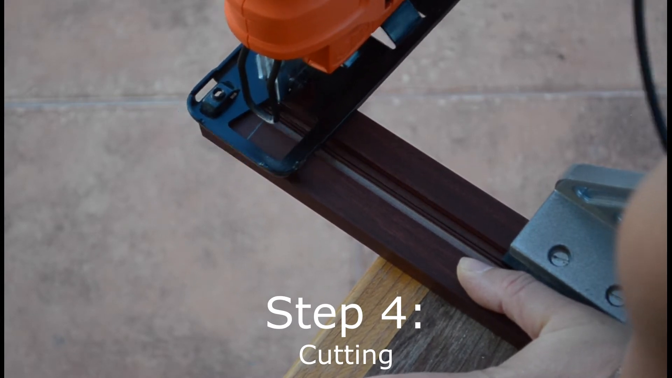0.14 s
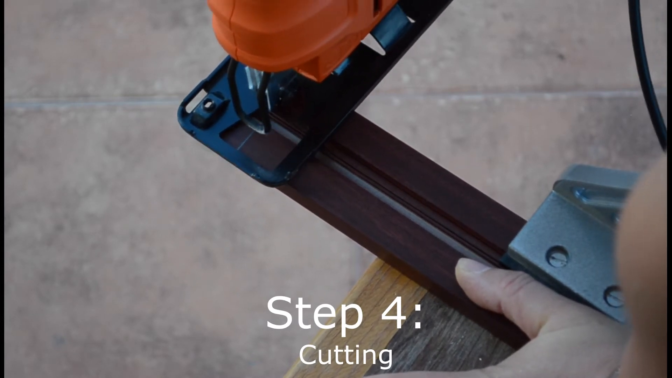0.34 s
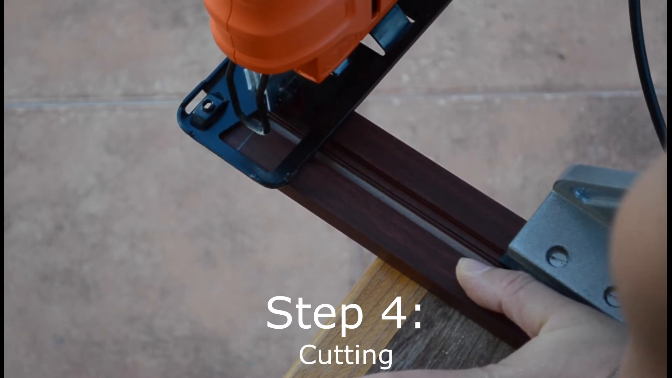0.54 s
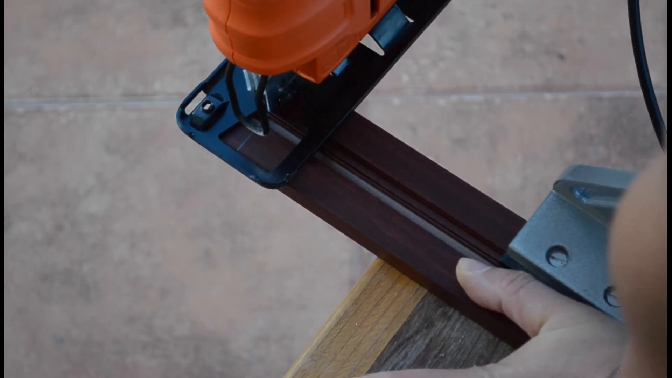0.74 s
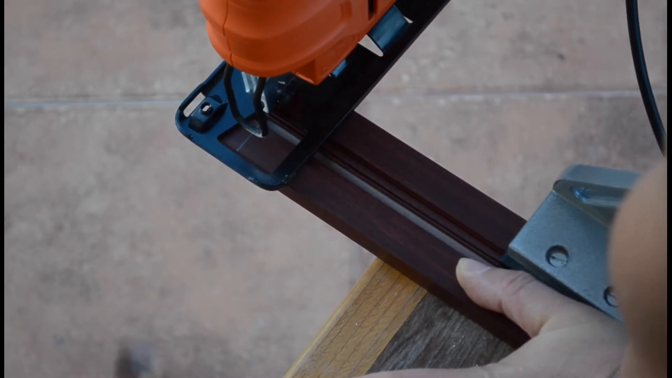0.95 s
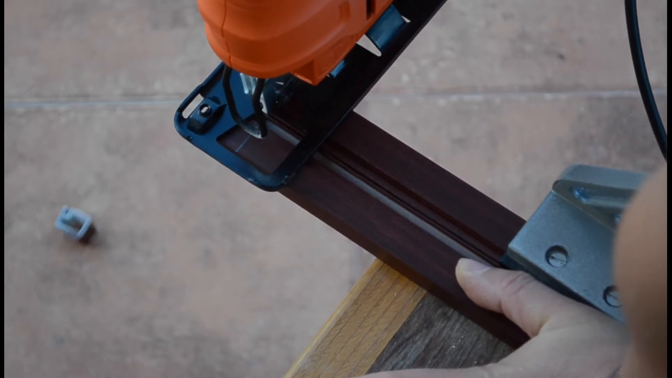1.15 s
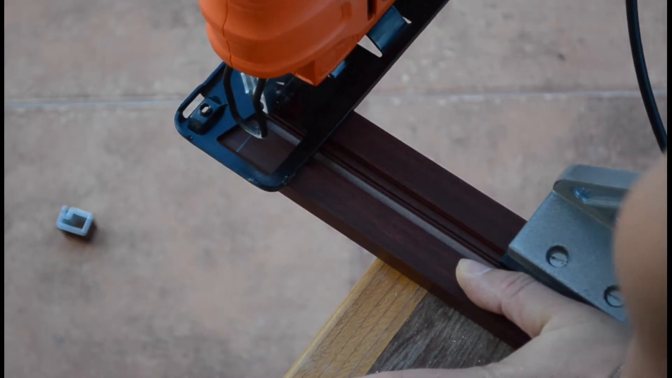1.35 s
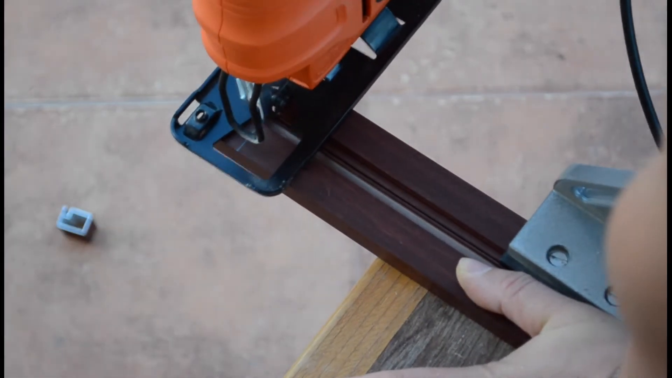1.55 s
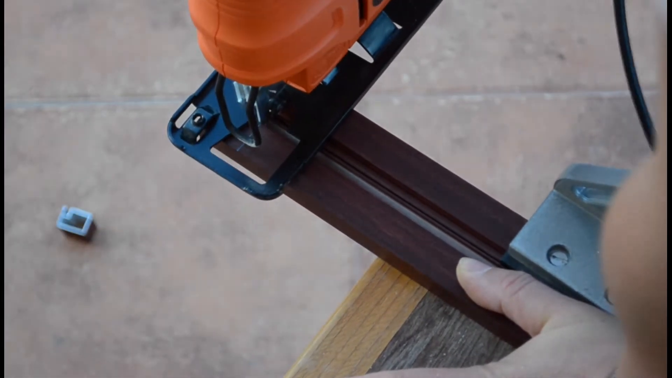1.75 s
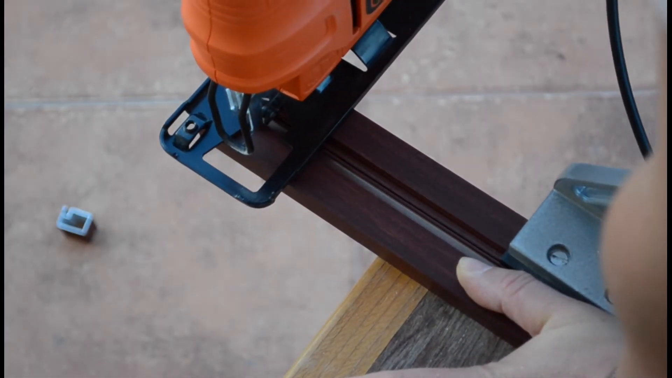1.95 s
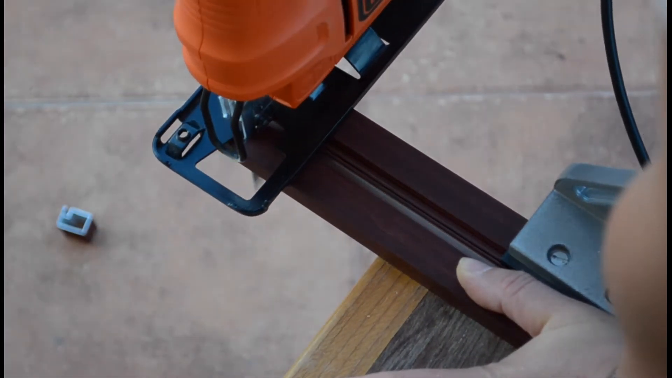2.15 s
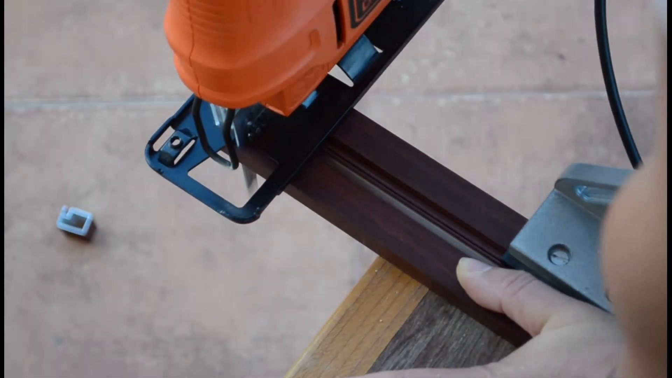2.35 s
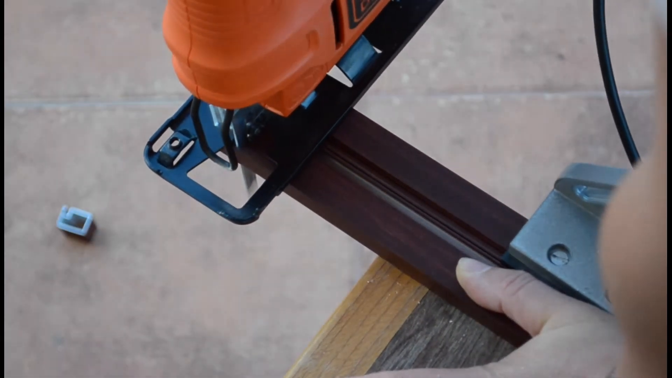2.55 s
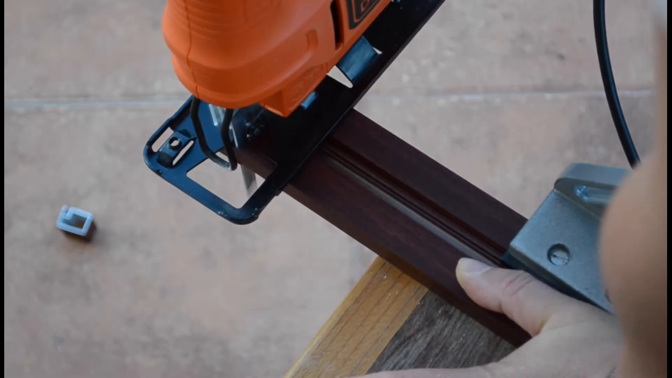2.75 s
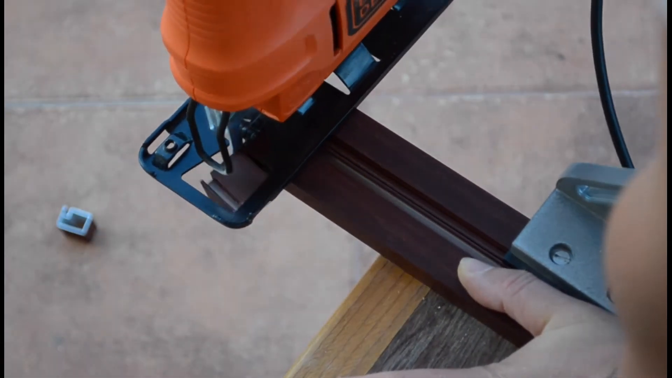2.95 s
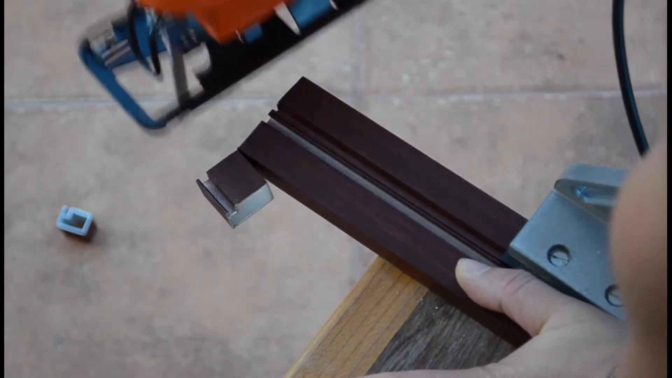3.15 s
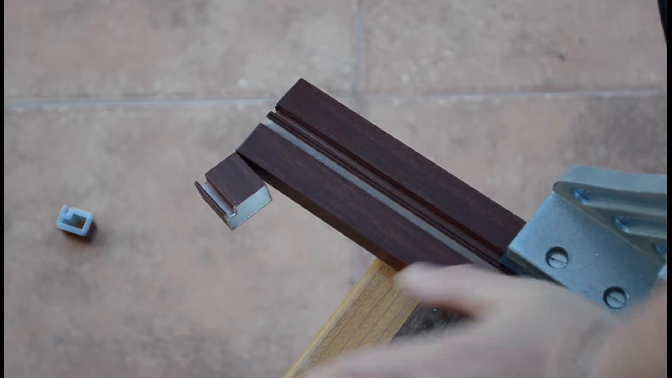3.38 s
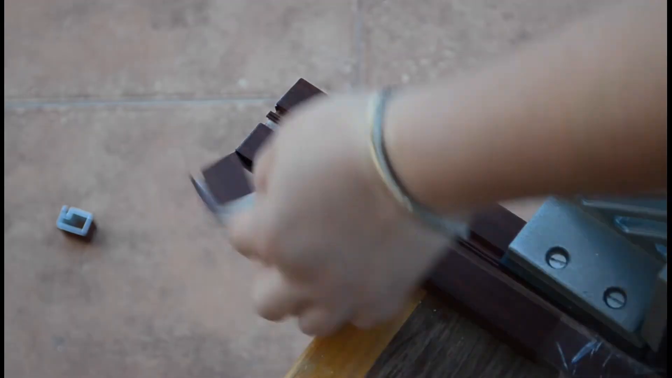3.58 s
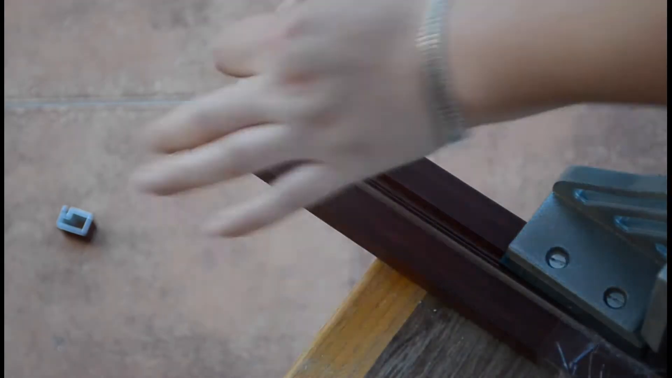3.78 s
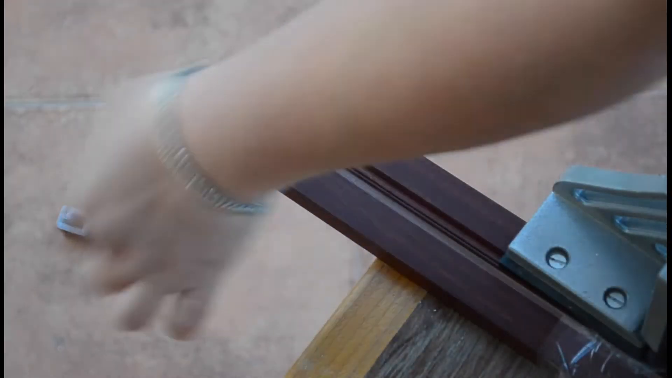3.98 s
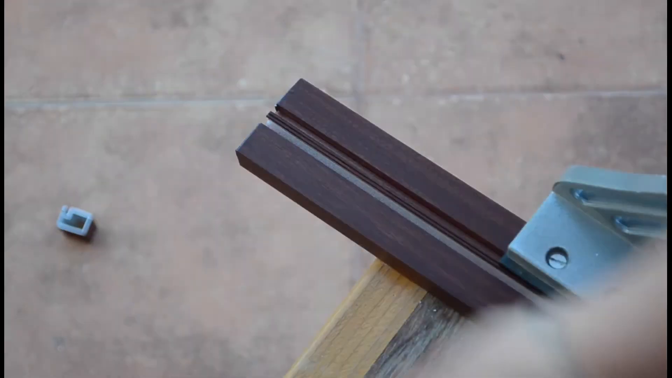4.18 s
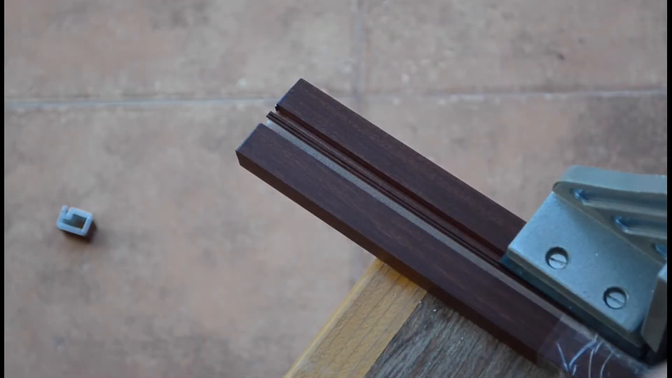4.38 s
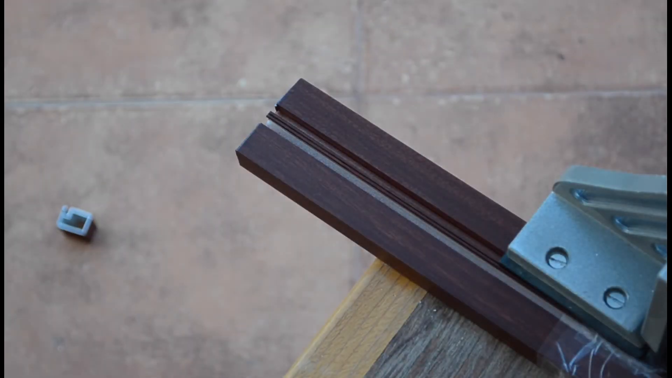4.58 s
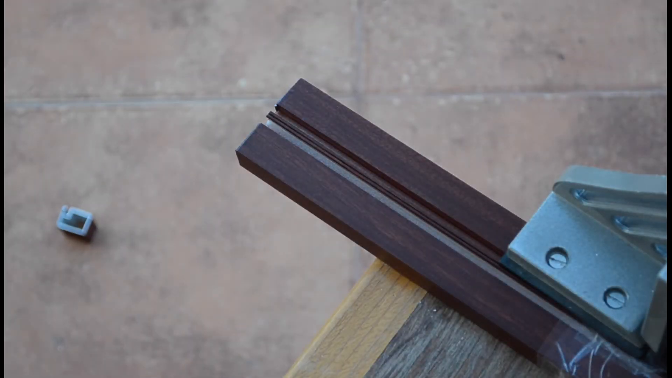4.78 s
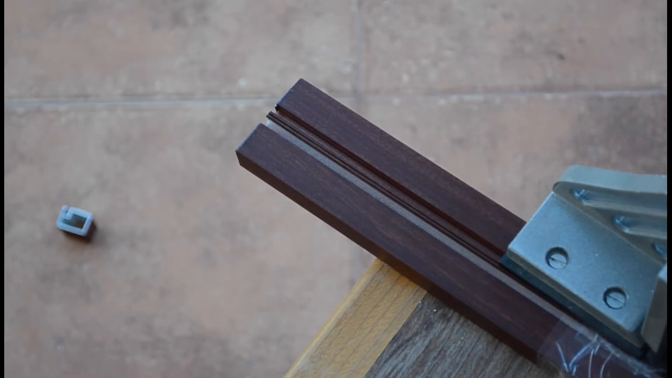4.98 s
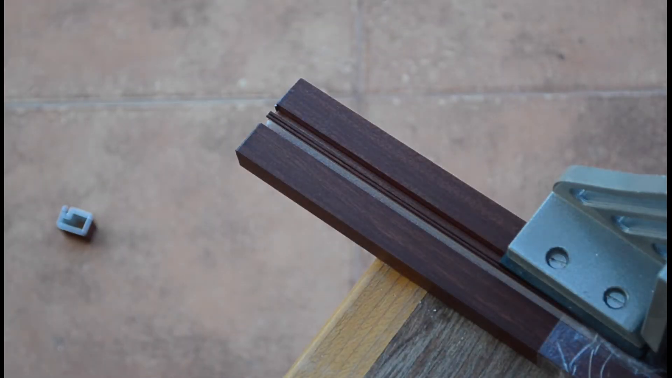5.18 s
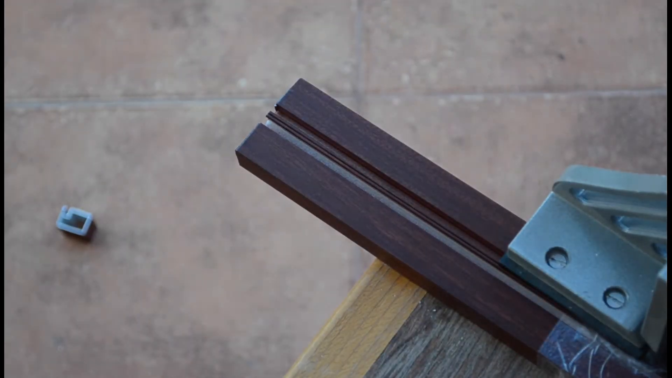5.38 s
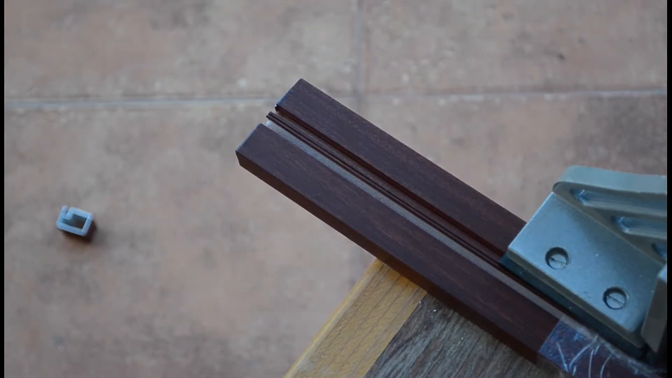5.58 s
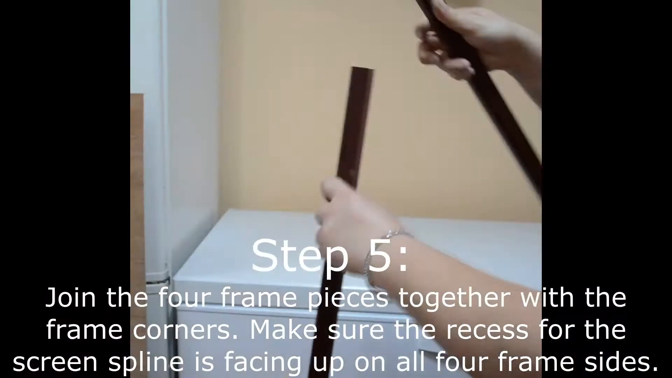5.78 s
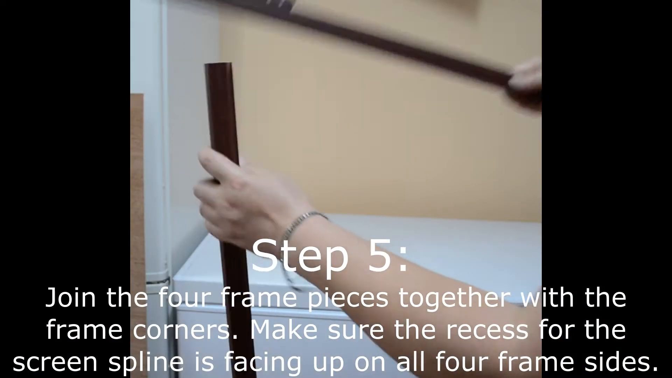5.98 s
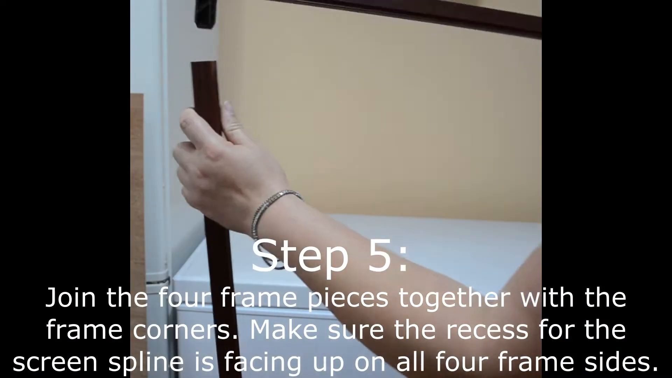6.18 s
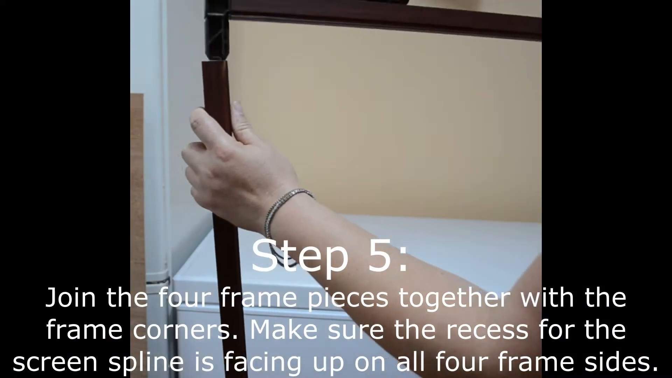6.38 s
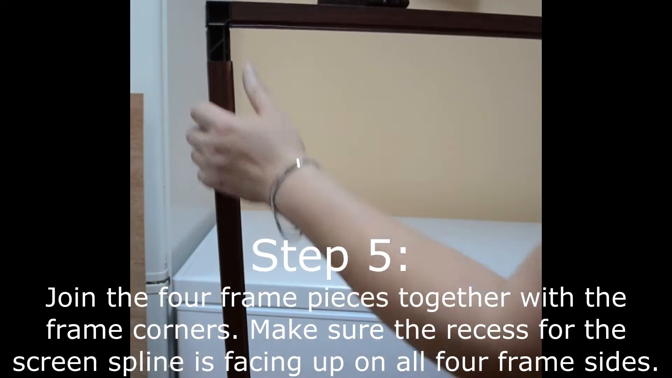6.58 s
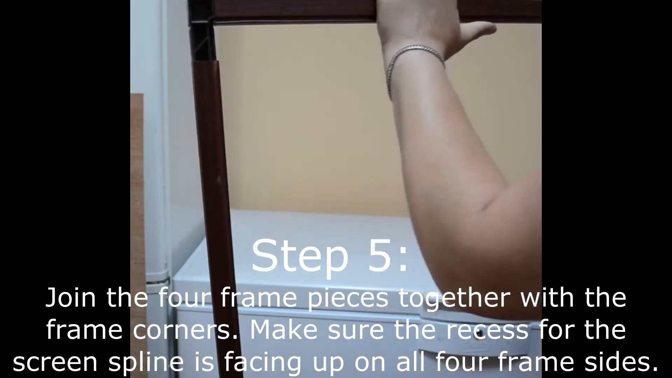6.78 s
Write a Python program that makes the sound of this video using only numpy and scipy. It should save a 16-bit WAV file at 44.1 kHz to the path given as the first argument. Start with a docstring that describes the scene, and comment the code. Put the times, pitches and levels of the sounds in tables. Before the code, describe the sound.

From 0 to about 2.9 s, a jigsaw close to the microphone cuts thin hollow metal outdoors: a dense, bright, buzzing rasp at over a hundred strokes a second, surging in short pushes with small dips between. Shrill squeals poke out early, near 1.2 s, and around 2.2-2.5 s; the loosening end chatters from about 2.1 s and again before the cut breaks through. Around 3 s the saw runs free, smoother and whirring, is switched off at 3.2 s, and falls in pitch and loudness, breaking into separate clacks until about 4.4 s. Dull bumps, low air buffets and light ticks accompany this. Then a faint quiet yard with tiny ticks until 5.7 s. After a momentary gap, a small room with soft hiss and hum: a sharp clack at 5.9 s, a weaker one at 6.0, then softer knocks and short, falling squeaks from 6.3 to 6.6 s, ending quietly by 7 s.

```python
"""A corded jigsaw cuts through a thin metal profile outdoors, runs free for a moment and coasts to a stop.
Teeth and chips excite the resonances of the hollow section once a stroke; chirps make the blade squeal.
Crank, gears and motor whine at multiples of the stroke rate, under filtered noise for fan air and gusts.
Then, in a small room, a frame corner clacks against the profile (noise cracks, damped modes)
and squeaks as it is pushed home (stick-slip harmonics)."""
import sys
import numpy as np
from scipy import signal
from scipy.fft import rfft, irfft, next_fast_len
from scipy.io import wavfile

SR = 44100
rng = np.random.default_rng(int(sys.argv[2]) if len(sys.argv) > 2 else 0)


def persist_wave(psi):
    """Save psi, clipped to +-1, as 16-bit WAV."""
    counts = np.round(np.clip(psi, -1, 1) * 32767).astype(np.int16)
    wavfile.write(sys.argv[1], SR, np.atleast_2d(counts).T)


N = 301192
T = np.arange(N) / SR  # time in seconds

FREE_HZ, OFF_S = 116, 3.2  # free stroke rate, and when the saw is switched off
UP_STROKE, RETURN_STROKE, REVERSAL = 0.95, 0.4, 0.2  # places in one turn of the crank (0-1)
BITE_S, EASE_S = 0.026, 0.015  # the teeth take hold and let go

# The hand feeds the saw in pushes; each loads the profile and the drive until it eases off.
# Each row: start and end in seconds, then the drive in dB of web, wall, edge, rub on the return stroke
# (relative), workpiece hum, crank shake and gear whine.
PUSHES = [(0.01, 0.139, -34.5, -39.5, -40.5, -1.5, -52.5, -52, -36),
          (0.19, 0.403, -34, -41.5, -35.5, 6, -51.5, -52.5, -45.5),
          (0.405, 0.594, -33, -40.5, -41.5, -5.5, -52, -60, -34),
          (0.616, 0.851, -32, -35.5, -43, 0.5, -47, -50, -37),
          (0.886, 1.174, -31.5, -33.5, -43.5, 0.5, -50, -48, -37.5),
          (1.177, 1.29, -40, -44, -42, -1, -57, -56, -53),
          (1.344, 1.543, -32, -34, -41.5, 1, -52.5, -51, -39),
          (1.535, 1.647, -29.5, -32.5, -35.5, -3.5, -55.5, -58, -45.5),
          (1.646, 1.672, -36, -45, -43, -6.5, -62, -61, -52),
          (1.73, 1.817, -32, -32.5, -36, -15.5, -52.5, -50.5, -48),
          (1.829, 2.12, -30, -35, -34, 1.5, -60.5, -58.5, -63.5),
          (2.116, 2.407, -30.5, -36.5, -37, 8, -62, -56.5, -75),
          (2.432, 2.53, -42, -36, -68, -5, -72, -56.5, -51),
          (2.557, 2.947, -35.5, -37.5, -45, 6, -58.5, -49.5, -66)]
# The crack of a knock, also the rub of a squeak. Each row: frequency in Hz, level in dB.
CRACK_COLOUR = [(180, -66), (300, -59), (404, -17), (1020, 4), (1710, -3), (1890, -9), (2230, -0.5),
                (2510, -3.5), (2860, 2.5), (3160, -4), (3550, -2.5), (5290, -0.5), (7010, -19.5),
                (9290, -16), (15800, -43)]


def amp(db):
    """Decibels to gain."""
    return 10 ** (np.asarray(db) / 20)


def unit(x):
    """Scales to rms 1."""
    return x / np.sqrt(np.mean(x ** 2) + 1e-20)


def curves(rows):
    """The columns of a timed table, one value a sample."""
    s, *columns = np.transpose(rows)
    return [np.interp(T, s, c) for c in columns]


def hold(start, end, rise, fall):
    """A straight attack up to the start, 1 until the end, then a straight release."""
    return np.clip(np.minimum((T - start) / rise, (end - T) / fall) + 1, 0, 1)


def span(start, end, fade):
    """1 between two times, with the same straight fade on both sides."""
    return hold(start, end, fade, fade)


def envelopes(rows, rise, fall):
    """One gain curve for each dB column of events (start, end, dB, ..)."""
    out = np.zeros((len(rows[0]) - 2, N))
    for start, end, *levels_db in rows:
        gain = hold(start, end, rise, fall)
        on = np.flatnonzero(gain)
        out[:, on] = np.maximum(out[:, on], np.outer(amp(levels_db), gain[on]))
    return out


def colour(x, points):
    """Filters by a spectrum given as (Hz, dB) points."""
    hz, db = np.transpose(points)
    size = next_fast_len(len(x), True)
    bins = np.fft.rfftfreq(size, 1 / SR)
    gain = amp(np.interp(np.log(bins + 1), np.log(hz + 1), db))
    return irfft(rfft(x, size) * gain, size)[:len(x)]


def noise():
    """White noise."""
    return rng.standard_normal(N)


def drift(hz, size=16384):
    """Slow chance of rms 1, rolled off steeply above a given rate."""
    rates = np.fft.rfftfreq(size, T[-1] / size)
    slow = irfft(rfft(rng.standard_normal(size)) / (1 + (rates / hz) ** 4))
    return np.interp(T, np.linspace(0, T[-1], size), unit(slow))


def resonate(x, hz, width):
    """One resonance of gain 1."""
    return signal.lfilter(*signal.iirpeak(min(hz, SR * .45), hz / width, SR), x)


def resonate_twice(x, hz, width):
    """Two equal resonances in a row, for steeper skirts."""
    return resonate(resonate(x, hz, width), hz, width)


def add(mix, s, sound):
    """Mixes a sound in at a time."""
    part = mix[round(s * SR):][:len(sound)]
    part += sound[:len(part)]


def lobe(turns, centre, sharpness):
    """A smooth burst once a turn."""
    return np.exp(sharpness * (np.cos(2 * np.pi * (turns - centre)) - 1))


def orders(turns, rows, waver_db):
    """Wavering tones at whole multiples of the stroke rate."""
    tones = 0
    for k, db in rows:
        level = amp(db + waver_db * drift(12.3))
        tones = tones + level * np.sin(2 * np.pi * (round(k) * turns + rng.random()))
    return np.sqrt(2) * tones


def backgrounds():
    """The quiet yard, a moment of silence, then a room with a humming appliance, as coloured noise and tones."""
    # Each row of the two noise colours: frequency in Hz, level in dB.
    yard_colour = [(15, -50), (25, -27), (43, -22), (107, -12), (216, -4.5), (352, -17), (382, -9.5),
                   (513, -10.5), (791, -13), (1040, -10.5), (3300, -7.5), (6850, -25), (9720, -33.5),
                   (15800, -51)]
    room_colour = [(25, -5), (70, -28), (110, -9), (260, -17), (400, -9), (650, -1), (1000, -6.5),
                   (1500, 0.5), (2400, -5), (3200, -4.5), (6000, -7), (10000, -9), (15800, -18)]
    # Hum of the appliance. Each row: frequency in Hz, level in dB.
    room_tones = [(160, -85.5), (490, -66.5), (980, -69.5), (2350, -70)]
    yard_db, room_db = -63, -58
    yard_end, room_start = 5.7, 5.79  # seconds, at full level
    yard = amp(yard_db + 0.99 * drift(3.7)) * unit(colour(noise(), yard_colour))
    tones = 0
    for hz, db in room_tones:
        level = amp(db + 0.63 * drift(7.9)) * np.sqrt(2)
        tones = tones + level * np.sin(2 * np.pi * hz * T + 0.5 * drift(11))
    room = amp(room_db) * unit(colour(noise(), room_colour)) + tones
    return yard * span(0, yard_end, 0.0017) + room * span(room_start, 7, 0.058)


def buffets():
    """Lumpy low gusts of air on the microphone over a faint draught, as coloured noise."""
    # Gusts. Each row: start and end in seconds, level in dB.
    gust_rows = [(2.635, 2.68, -57), (2.77, 2.81, -56), (2.89, 2.96, -57), (3.03, 3.15, -48),
                 (3.19, 3.205, -48), (3.465, 3.48, -50), (3.59, 3.66, -54), (3.77, 3.86, -58),
                 (3.9, 3.96, -52.5), (4.005, 4.13, -52), (4.24, 4.3, -60.5), (4.35, 4.4, -55),
                 (4.573, 4.582, -68), (4.617, 4.628, -58)]
    # Stirred air between the gusts: start and end in seconds, level in dB.
    draught_row = (3.1, 4.7, -70.5)
    # Rumble of the air. Each row: frequency in Hz, level in dB.
    rumble_colour = [(18, -41.5), (30, -24), (80, 2), (214, 11.5), (339, 7.5), (408, 3.5), (478, 1),
                     (622, -12), (700, -7), (910, -27), (1540, -120)]
    gusts, = envelopes(gust_rows, rise=0.01, fall=0.019)
    draught, = envelopes([draught_row], rise=0.12, fall=0.093)
    return np.maximum(gusts, draught) * amp(0.91 * drift(34.7)) * unit(colour(noise(), rumble_colour))


def bumps():
    """Dull handling bumps: a few damped partials that swell and die."""
    # Each row: start in seconds, level in dB before the decay, pitch in Hz, t60 in seconds.
    bump_rows = [(3.192, -34.5, 393, 0.076), (3.463, -25.5, 412, 0.035), (4.07, -51, 200, 0.12),
                 (4.371, -45, 216, 0.11)]
    rise_s = 0.0087
    out, t = np.zeros(N), T[:SR // 4]
    for s, db, hz, t60 in bump_rows:
        partials = sum(np.sin(2 * np.pi * (hz * ratio * t + rng.random())) for ratio in (0.4, 0.68, 1, 1.27))
        add(out, s, np.minimum(t / rise_s, 1) * amp(db - 60 * t / t60) * unit(partials))
    return out


def ticks():
    """Decaying band noise: a few last clacks of the coasting saw, then light ticks, scuffs and one faint ring
    as the saw and the frame are handled."""
    # Each row: start in seconds, level in dB, centre in Hz, half the width of each filter pass in Hz,
    # t60 in seconds.
    tick_rows = [(3.955, -44, 4200, 3000, 0.027), (3.985, -41, 3486, 2000, 0.028),
                 (4.056, -46, 4500, 2800, 0.022), (4.27, -64, 1207, 21, 1.7),
                 (4.363, -45.5, 2720, 1200, 0.032), (4.375, -52, 2750, 1000, 0.05),
                 (4.394, -54, 3210, 1500, .03), (5.05, -68, 9980, 1800, 0.19),
                 (5.34, -61, 6040, 1900, 0.019), (5.41, -61, 5930, 1800, 0.029),
                 (5.525, -50, 5170, 1300, 0.013), (6.313, -50, 7630, 1100, 0.13),
                 (6.382, -53, 11000, 3800, 0.57), (6.615, -50, 8000, 4000, 0.13),
                 (6.8, -50.5, 8500, 4500, 0.33)]
    out, t = np.zeros(N), T[:SR // 2]
    for s, db, hz, width, t60 in tick_rows:
        band = unit(resonate_twice(rng.standard_normal(len(t)), hz, 2 * width))
        add(out, s, amp(db - 60 * t / t60) * band)
    return out


def knocks():
    """A short crack, the hand-damped modes of the frame and a hollow thud; softer blows are mostly duller."""
    # Frame parts knock together. Each row: start in seconds, level in dB, brightness in dB per octave.
    knock_rows = [(5.863, -13.5, 3), (6.028, -24, 0), (6.143, -41.5, -9), (6.183, -37, -4.5),
                  (6.303, -50.5, -1), (6.44, -33, -2.5), (6.507, -33.5, -4), (6.535, -35.5, -3.5),
                  (6.564, -30, -6), (6.796, -51.5, -7)]
    # Each row: frequency in Hz, level in dB, t60 in seconds.
    frame_modes = [(980, -1, 0.049), (2320, -7.5, 0.082), (2710, -23, 0.18), (2980, -23, 0.056),
                   (3450, -6, 0.067), (3610, -7, 0.064), (4330, -22, 0.06), (4790, -5, 0.044),
                   (4240, -25, 0.067), (5340, -29, 0.22), (5000, -3.5, 0.063), (5560, -18, 0.093),
                   (5560, -30, 0.12), (6440, -31, 0.078), (7240, -21, 0.091), (7340, -23, 0.073),
                   (8100, -21, 0.067), (8400, -18, 0.069), (8650, -19, 0.089), (9600, -41, 0.13)]
    out, t = np.zeros(N), T[:SR // 4]
    for s, db, tilt_db in knock_rows:
        crack_decay = amp(-60 * t / 0.072) + amp(-22.0 - 60 * t / 0.17)
        crack = unit(colour(rng.standard_normal(len(t)), CRACK_COLOUR)) * crack_decay
        modes = sum(amp(mode_db - 60 * t / t60) * np.sin(2 * np.pi * (hz * t + rng.random()))
                    for hz, mode_db, t60 in frame_modes)
        body = colour(unit(crack) + 0.6 * unit(modes), [(800, 0), (12800, 4 * tilt_db)])
        thud = sum(amp(-60 * t / 0.076) * np.sin(2 * np.pi * hz * rng.uniform(0.91, 1.2) * t)
                   for hz in (830, 960))
        tick = amp(-60 * t / 0.032) * rng.standard_normal(len(t))
        blow = unit(body) + amp(-7.5 - 2.66 * tilt_db) * unit(thud) + amp(-14.5 - 2.36 * tilt_db) * unit(tick)
        # the level is that of the first 5 ms
        add(out, s, amp(db) * blow / np.std(blow[:SR // 200]) * (t < .2))
    return signal.sosfilt(signal.butter(6, 470, "high", fs=SR, output="sos"), out)


def squeaks():
    """Stick-slip pulses that slow as the corner seats; the third harmonic sweeps over a mode of the profile."""
    # Each row: start and end in seconds, start and end pitch in Hz, level in dB, slope in dB per harmonic.
    squeak_rows = [(6.275, 6.301, 1145, 980, -38, -24), (6.335, 6.368, 1083, 960, -36, -4.5),
                   (6.363, 6.404, 958, 890, -39, -5), (6.426, 6.439, 927, 910, -42, -1),
                   (6.458, 6.514, 948, 826, -42.5, -7.5)]
    # The mode of the profile: frequency in Hz, width in Hz, level in dB.
    profile_mode = (2770, 36, 15.6)
    out = np.zeros(N)
    for start, end, start_hz, end_hz, db, slope_db in squeak_rows:
        count = max(round((end - start) * SR), 64)
        pitch = np.linspace(start_hz, end_hz, count) * (1 + 0.017 * drift(400)[:count])
        phase = 2 * np.pi * np.cumsum(pitch) / SR
        flutter_db = 3 * drift(50)[:8 * count].reshape(8, count)  # each harmonic wavers on its own
        slips = sum(amp(slope_db * k + flutter_db[k]) * np.cos((k + 1) * phase) for k in range(8))
        rub = amp(-17) * unit(colour((1 + np.cos(phase)) * rng.standard_normal(count), CRACK_COLOUR))
        add(out, start, amp(db) * (rub - unit(slips)) * signal.windows.tukey(count, .6))
    hz, width, db = profile_mode
    return out + amp(db) * resonate(out, hz, width)


def stroke_rate():
    """Strokes a second: sagging under load, running free, then slowed by air drag and dry friction."""
    # Blade speed under load. Each row: time in seconds, stroke rate in Hz.
    loaded = [(0, 110.6), (0.13, 107.3), (0.26, 113.6), (0.36, 114.9), (0.48, 111.2), (0.62, 107.2),
              (0.85, 105.2), (1.0, 106.3), (1.27, 103.4), (1.42, 106), (1.51, 105.4), (1.62, 102.6),
              (1.73, 105.3), (1.86, 104.3), (2.06, 107.7), (2.33, 110), (2.55, 113.4), (2.76, 112.3),
              (2.94, 112.4), (3.0, 110.3)]
    coast_s, friction_hz_per_s = 1.05, 42.86  # time constant of the air drag, steady braking by friction
    powered, = curves(list(loaded) + [(OFF_S, FREE_HZ)])
    friction = friction_hz_per_s * coast_s
    coasting = (FREE_HZ + friction) * np.exp((OFF_S - T) / coast_s) - friction
    return np.maximum(np.where(T < OFF_S, powered, coasting), 0.5)


def lifted():
    """0 with the blade in the slot, 1 once the saw is clear of the profile."""
    through_s, lift_s = 2.887, 0.16
    return np.clip((T - through_s) / lift_s, 0, 1)


def tooth_pattern(turns, centre, spread, lasts=0.262, size=800):
    """The same teeth strike every stroke: even harmonics, bunched unless spread wide, slowly changing."""
    shape = np.cumsum(spread * rng.standard_normal(size // 2 + 1))
    change = 0.43 * rng.standard_normal((int(T[-1] / lasts) + 2, len(shape)))
    audible = np.arange(len(shape)) * FREE_HZ < SR * .4
    patterns = irfft(np.exp(1j * (shape + change)) * audible)
    age, place = T / lasts, ((turns - centre) % 1) * size
    k, blend = age.astype(int), age % 1
    steps = np.arange(patterns.size)
    old, new = (np.interp(row * size + place, steps, patterns.ravel()) for row in (k, k + 1))
    return unit((1 - blend) * old + blend * new)


def mechanism(turns, speed):
    """Fan air and loose gears; as the saw slows, the clack at each reversal stands apart, then softens."""
    # Noise at full speed, then when nearly stopped. Each row: frequency in Hz, level in dB.
    fast_colour = [(380, -34), (650, -22.5), (896, -15), (1120, -0.5), (1220, -7.5), (1390, -6.5),
                   (1750, 2), (2500, -2.5), (3360, 0.5), (5150, -2.5), (6630, -5), (7280, -9), (8660, -9),
                   (11900, -16.5), (15800, -18)]
    slow_colour = [(380, -30.5), (650, -15.5), (1110, -10), (1790, -10), (1940, -15.5), (2710, 2.5),
                   (3310, -8), (4210, -4), (6550, -7.5), (7700, -2.5), (9260, -11), (11600, -11),
                   (15800, -28)]
    # What the saw's case rings with. Each row: frequency in Hz, width in Hz, level in dB.
    case_modes = [(2150, 120, -7), (3070, 130, -3), (3660, 200, -2), (4250, 260, -2), (5730, 150, -3),
                  (7480, 180, -1)]
    slot_db, strain_db, clear_db = -32.5, 3.5, -27.5  # in the slot, extra while pushed, lifted clear
    run_db_per_octave = 9  # quieter as the speed falls
    clack_turns = 0.055  # time constant of a clack, in turns of the crank
    clack_hz = 27  # below this stroke rate the reversals soften
    pushed = np.minimum(envelopes(PUSHES, BITE_S, EASE_S)[0] / amp(-31.5), 1)  # strain follows the bite
    level_db = slot_db + strain_db * pushed + (clear_db - slot_db) * lifted()
    level_db = level_db + run_db_per_octave * np.log2(speed / FREE_HZ)
    slow = np.clip(1 - speed / speed.max(), 0, 1)
    top, bottom = (np.exp(-((turns - place) % 1) / clack_turns) for place in (REVERSAL, REVERSAL + .5))
    clacks = unit((top + 0.65 * bottom) * noise()) * amp(1.2 * drift(50))
    rattle = unit(np.sign(noise()) * (rng.random(N) < 700 / SR))  # about 700 stray clicks a second
    share = np.clip((0.13 + 0.78 * slow) * np.minimum(speed / clack_hz, 1) ** 2, 0, 1)
    grind = span(0, 2.93, 0.041) * 0.4  # under load the gears are pressed together and repeat each turn
    rush = (noise() + grind * tooth_pattern(turns, UP_STROKE, spread=2.47)) / np.sqrt(1 + grind ** 2)
    rush = rush * (1 + 1.1 * grind * np.cos(2 * np.pi * turns))  # strained hardest on the up stroke
    drive = np.sqrt(1 - share) * rush + np.sqrt(share) * unit(clacks + 0.8 * rattle)
    drive = drive + sum(amp(db) * resonate(drive, hz, width) for hz, width, db in case_modes)
    fast_gain, slow_gain = np.sqrt(1 - slow), np.sqrt(slow)
    sound = fast_gain * unit(colour(drive, fast_colour)) + slow_gain * unit(colour(drive, slow_colour))
    return amp(level_db) * sound / (fast_gain + slow_gain) * span(0, 4.42, 0.0487)


def motor(turns, speed):
    """Crank shake, gear mesh and motor whine are all multiples of the stroke rate."""
    # Each row of these four: multiple of the stroke rate, level in dB.
    crank_orders = [(3, -3), (7, -4), (9, -3), (2, -21.5)]
    work_orders = [(4, -0.5), (5, -7), (6, -14.5), (7, -13.5), (8, -5.5), (9, -10)]
    gear_orders = [(46, -6), (47, -8), (48, -1), (49, -4.5), (50, -8.5)]
    motor_orders = [(10, -2), (20, -14), (25, 0), (29, -3)]
    # How the housing lets the motor whine out. Each row: frequency in Hz, gain in dB.
    housing = [(650, -36), (880, -9), (1150, 1), (1350, 0), (1650, 6), (2000, -12), (2700, 0), (3300, -12)]
    whine_slot_db, whine_clear_db, idle_gear_db = -61, -42, -43  # motor in the slot, in the clear; free gears
    fade_db = -15.5  # an octave below free speed; grows with the square of the octaves
    # hum and whine follow the pushes more slowly than the teeth
    work_gain, crank_gain, gear_gain = envelopes(PUSHES, rise=0.083, fall=0.079)[4:]
    hum = crank_gain * orders(turns, crank_orders, waver_db=-0.8)
    hum = hum + work_gain * orders(turns, work_orders, waver_db=0.5)
    # low noise that swells with the workpiece hum
    board_colour = [(30, -34), (200, -24.0), (350, 7.0), (450, 7.0), (600, -8.5), (900, 4.0),
                    (1500, -36.5), (4000, -76.0)]
    board = amp(-2.5) * work_gain * unit(colour(noise(), board_colour))
    backlash = .0006 * drift(120)
    gear_level = gear_gain + amp(idle_gear_db) * lifted()
    gears = gear_level * orders(turns + backlash, gear_orders, waver_db=1.5)
    gears = amp(1.5) * resonate(gears, hz=5010, width=200)  # the gear case rings with the mesh
    motor_db = whine_slot_db + (whine_clear_db - whine_slot_db) * lifted()
    wobble = .005 * drift(70)
    whine = colour(amp(motor_db) * orders(turns + wobble, motor_orders, waver_db=2.5), housing)
    fade = amp(fade_db * np.log2(speed / FREE_HZ) ** 2)
    return (hum + board) * amp(1.6 * drift(14)) + (gears + whine) * fade


def squeals(turns, speed):
    """The blade starts a falling chirp on every stroke; the wider it swings, the less alike the strokes."""
    # The blade squeals in the slot. Each row: start and end in seconds, pitch in Hz, level in dB,
    # octave in dB, pitch swing as a share, place in the stroke (0-1).
    squeal_rows = [(0, 0.14, 3760, -33.5, -24, 0.005, 1), (0, 0.32, 3320, -42, -29, 0.019, 0.92),
                   (0.38, 0.79, 3740, -32, -34, 0.003, 1), (1.183, 1.306, 4170, -27, -9.5, 0.055, 0.54),
                   (1.566, 1.635, 5770, -33, -33, 0.028, 0.1),
                   (2.15, 2.407, 5740, -37, -28.5, 0.0078, 0.85),
                   (2.424, 2.491, 5400, -33.5, -18, 0.031, 0.78),
                   (2.482, 2.527, 5430, -28.5, -21, 0.11, 0.78),
                   (2.849, 2.864, 4300, -23.5, -22, 0.0067, 0.38)]
    slip = 18  # phase wander (radians per share of swing)
    out = np.zeros(N)
    for start, end, hz, db, octave_db, share, centre in squeal_rows:
        within = (turns - centre + .5) % 1 - .5
        cycles = hz / speed * (within + share * np.cos(2 * np.pi * within) / (2 * np.pi))
        phase = 2 * np.pi * cycles + slip * share * drift(180)
        swell = np.cos(np.pi * within) ** 2 * lobe(turns, centre, sharpness=.8)
        burst = unit(swell * amp(1.5 * drift(60)))
        octave = amp(octave_db + 5 * drift(60))
        chirp = unit(np.sin(phase) + octave * np.sin(2 * phase))
        out += amp(db) * span(start + 0.0043, end - .02, 0.027) * burst * chirp
    return signal.sosfilt(signal.butter(6, 2200, "high", fs=SR, output="sos"), out)


def chatter(turns):
    """The loosening end slaps the blade twice a stroke, dull then bright, each blow a little early or late."""
    # The nearly severed end. Each row: start and end in seconds, dull slap in dB, bright slap in dB.
    chatter_rows = [(2.13, 2.39, -40, -35.5), (2.57, 2.935, -38.5, -32)]
    # Dull slap, then bright. Each row: place in the stroke (0-1), list of (multiple of stroke rate, dB).
    slaps = [(0.57, [(9, -7), (10, -1), (11, -1), (12, 0), (13, -3)]), (0.95, [(10, -9), (13, 0), (15, -2),
             (16, -2), (17, 2.5), (18, 1.5), (19, -1), (23, -10)])]
    loose = turns + 0.0035 * drift(80)
    gains = envelopes(chatter_rows, rise=0.073, fall=0.024)
    uneven = amp(1.6 * drift(54))
    out = 0
    for gain, (place, rows) in zip(gains, slaps):
        slap = sum(amp(db + drift(12)) * np.sin(2 * np.pi * k * (loose - place)) for k, db in rows)
        out = out + gain * unit(slap)
    return uneven * out


def catches(turns):
    """One hard scrape a stroke rings the part that the teeth have caught."""
    # The teeth hammer the profile. Each row: start and end in seconds, frequency in Hz,
    # width of each filter pass in Hz, level in dB, place in the stroke (0-1).
    catch_rows = [(0.037, 0.057, 1990, 250, -32.5, 0), (0.118, 0.125, 2020, 450, -27.5, 0.02),
                  (0.183, 0.292, 3230, 220, -34, 0.31), (0.288, 0.32, 4500, 350, -32, 0.99),
                  (1.19, 1.29, 3680, 450, -38.5, 0.17), (1.542, 1.571, 3900, 900, -27.5, 0.45),
                  (1.578, 1.591, 1170, 250, -26, 0.84), (1.595, 1.631, 1260, 350, -34.5, 0.57),
                  (1.75, 1.804, 1800, 400, -33.5, 0.14), (1.808, 1.832, 1230, 250, -33.5, 0.7),
                  (1.84, 2.2, 4450, 250, -38.5, 0.77), (1.92, 2.015, 3520, 300, -34, 0.82),
                  (2.018, 2.08, 1310, 300, -33, 0.75), (2.45, 2.8, 3560, 350, -38, 0.85)]
    out, rasp = np.zeros(N), noise() * amp(2 * drift(70))
    for start, end, hz, width, db, place in catch_rows:
        gain = span(start, end, fade=0.0074)
        near = gain > 0
        blows = lobe(turns[near], place, sharpness=7) * rasp[near]
        out[near] += amp(db) * gain[near] * unit(resonate_twice(blows, hz, width))
    return out


def ring(x, modes):
    """A body's resonances with steep skirts, their balance shifting as the cut deepens; rms 1."""
    # How deep the blade is. Each row: time in seconds, share of the depth (0-1).
    depth_rows = [(1.5, 0), (1.85, 0.76)]
    depth = np.clip(curves(depth_rows)[0], 0, 1)
    return unit(sum(amp(early + depth * (deep - early)) * resonate_twice(x, hz, 2 * width)
                    for hz, width, early, deep in modes))


def cutting(turns):
    """Teeth rasp on the up stroke and rub on the return, driving the walls, web and edge of the profile."""
    # What the profile rings with. Each row: frequency in Hz, half the width of each filter pass in Hz,
    # level in dB early in the cut, level in dB deep in the cut.
    wall_modes = [(1150, 150, -1, -1), (1330, 130, -5, -1), (1780, 170, -5, 0), (2030, 170, -2, 0)]
    web_modes = [(2470, 160, -5, -5), (2700, 260, -10, -6), (2900, 220, -3, -6), (3320, 220, -1, -3),
                 (3650, 300, 0, 0), (4020, 180, -4, -6), (4330, 150, -7, -2), (4580, 160, -7, 0)]
    edge_modes = [(5750, 220, -7, 1), (6400, 500, -2, -9), (7400, 400, -5, -2.5), (8250, 300, -4, 0),
                  (8780, 400, -7, -1), (10200, 700, -13, -15), (11450, 260, -11, -10),
                  (12300, 400, -12, -16), (13100, 450, -17, -12)]
    rub_share, return_share = 0.15, 0.48  # steady rubbing and the return stroke, against the up stroke
    web_gain, wall_gain, edge_gain, rub = envelopes(PUSHES, BITE_S, EASE_S)[:4]
    force = amp(1.4 * drift(60))  # no two strokes bite quite alike
    back = return_share * rub
    balance = np.sqrt(1 + back ** 2)
    teeth = tooth_pattern(turns, UP_STROKE, spread=0.7)
    teeth = teeth + back * tooth_pattern(turns, RETURN_STROKE, spread=1.1)
    stroke = lobe(turns, UP_STROKE, sharpness=2.2) + rub_share * rub
    stroke = stroke + back * lobe(turns, RETURN_STROKE, sharpness=4.1)
    teeth = force * unit(teeth / balance)
    chips = force * unit(stroke * noise() / balance)
    walls = wall_gain * amp(1.2 * drift(22)) * ring(teeth + 0.55 * chips, wall_modes)
    web = web_gain * ring(teeth + .4 * chips, web_modes)
    edge = edge_gain * amp(1.9 * drift(13.0)) * ring(teeth + chips, edge_modes)
    sound = walls + web + edge + catches(turns)
    # the narrow profile radiates almost nothing below its first wall mode
    return signal.sosfilt(signal.butter(8, 980, "high", fs=SR, output="sos"), sound)


def scene():
    """The saw outdoors, then the frame indoors."""
    speed = stroke_rate()
    turns = np.cumsum(speed) / SR + .0015 * drift(25)  # turns of the crank, slightly uneven
    saw = cutting(turns) + squeals(turns, speed) + chatter(turns) + motor(turns, speed) + mechanism(turns, speed)
    return (saw + buffets() + bumps() + ticks() + backgrounds() + knocks() + squeaks())[None]


def record(dry):
    """A steep low-pass limits the band to 15950 Hz."""
    low_pass = signal.firwin(511, 15950, window=("kaiser", 9), fs=SR)
    return signal.oaconvolve(dry, low_pass[None], "same")


dry = scene()
out = record(dry)
persist_wave(out)
```